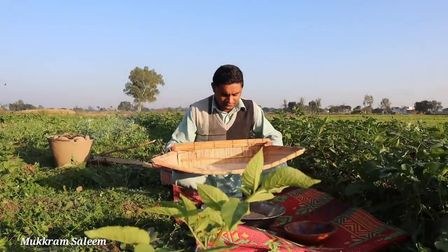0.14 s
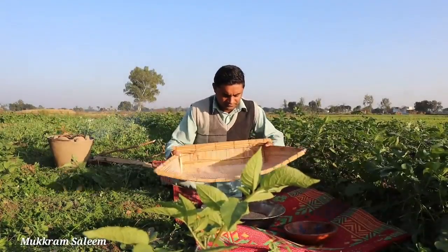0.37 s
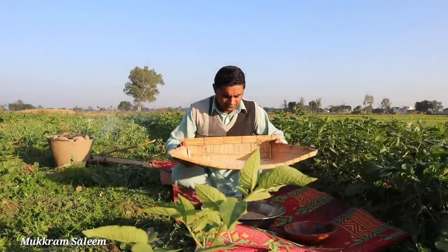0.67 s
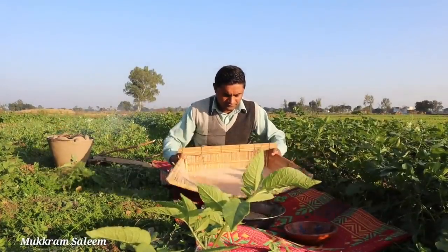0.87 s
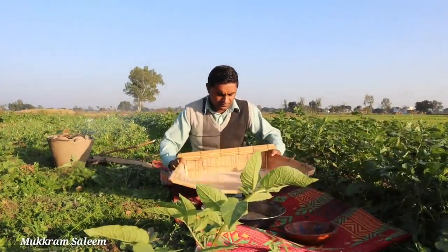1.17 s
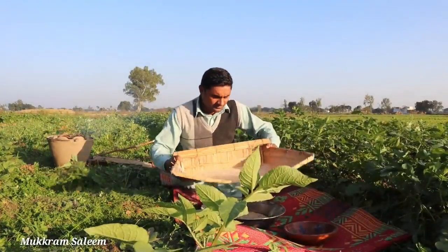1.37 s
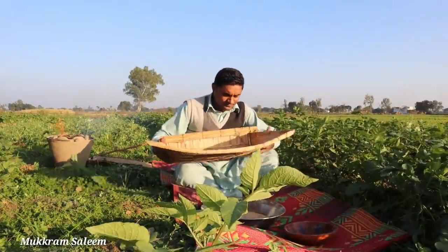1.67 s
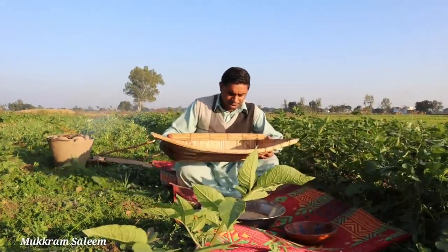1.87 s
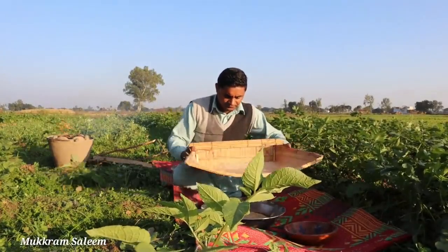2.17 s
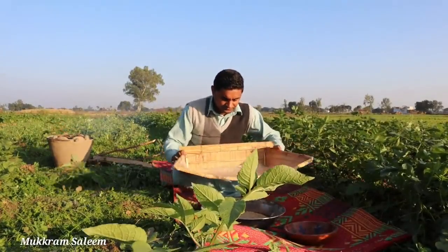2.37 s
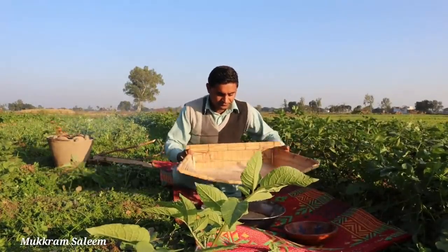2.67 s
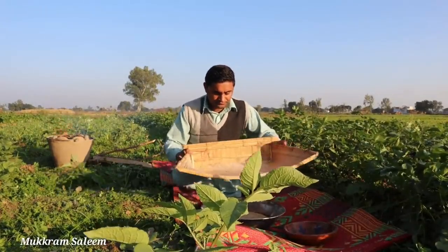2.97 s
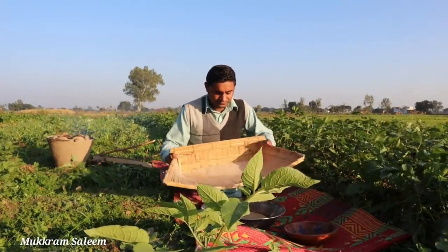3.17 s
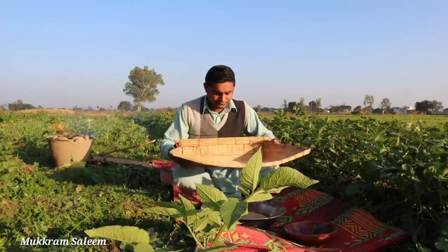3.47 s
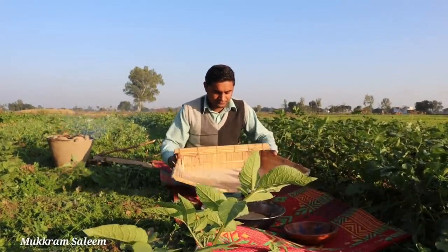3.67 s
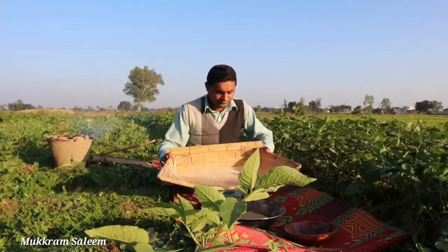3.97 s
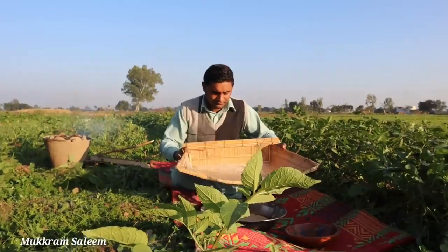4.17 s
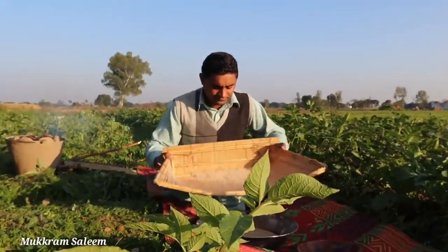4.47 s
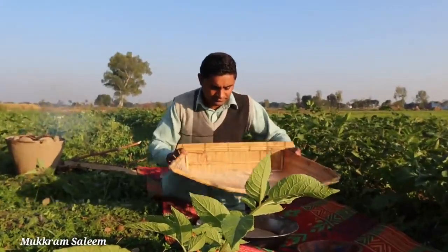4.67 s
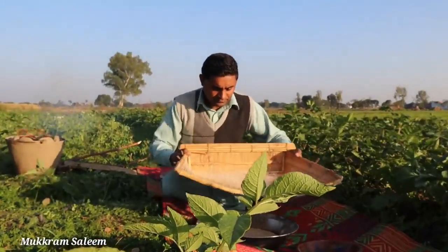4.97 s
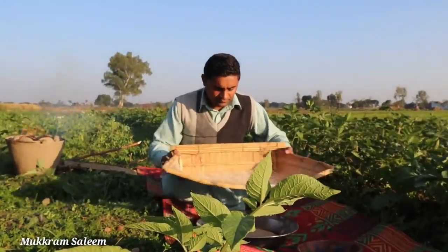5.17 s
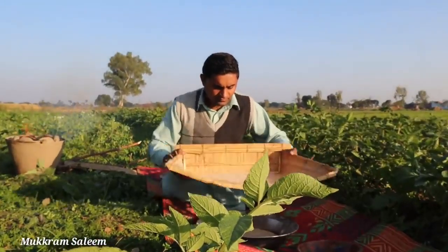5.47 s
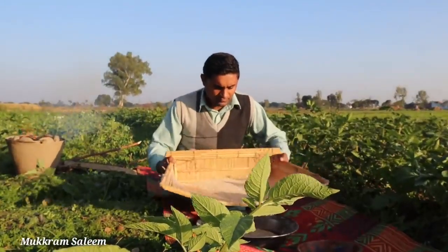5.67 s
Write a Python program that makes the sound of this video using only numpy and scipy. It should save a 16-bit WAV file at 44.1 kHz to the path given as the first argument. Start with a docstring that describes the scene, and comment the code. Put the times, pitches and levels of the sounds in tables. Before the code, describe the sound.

Quick rasping swishes of grain in a woven tray alternate with tosses, slaps and pattering kernels, under gusts of rumbling wind.

```python
"""Coarse cracked grain is winnowed in a reed tray in an open field, heard in mono from close by.
Over a faint background, gusts rumble on the microphone as quick sideways shakes scrape the grain
across the weave and lumps and fingers knock on the tray. The tray is tipped, tossed and slapped;
loose kernels patter and tick. A second bout of shaking ends in more tosses and two slaps as the
wind grows stronger, and a third, the longest and loudest, closes the scene."""
import sys
import numpy as np
from scipy import signal
from scipy.fft import rfft, irfft, next_fast_len
from scipy.io import wavfile
from scipy.ndimage import uniform_filter1d

SR = 44100
rng = np.random.default_rng(int(sys.argv[2]) if len(sys.argv) > 2 else 0)


def wrap_up_sound(samples):
    """Save the sound to the file named by the first command line argument, as 16-bit audio."""
    columns = np.atleast_2d(samples).T
    # keep every value between -1 and 1, then stretch to whole-number steps
    tamed = np.clip(columns, -1, 1)
    steps = np.round(tamed * 32767).astype(np.int16)
    wavfile.write(sys.argv[1], SR, steps)


N = 257086
TIME = np.arange(N) / SR
GRAIN_BAND_HZ = (2500, 13000)


def undb(db):
    """Amplitude grows tenfold for every 20 dB."""
    return 10 ** (np.asarray(db) / 20)


def colour(x, points, band_hz):
    """Minimum-phase filtering gives x a spectrum by causal ringing; unit rms inside the band."""
    size = next_fast_len(N + SR // 4, real=True) // 2 * 2
    hz = np.arange(size // 2 + 1) * SR / size
    point_hz, point_db = np.transpose(points)
    magnitude = undb(np.interp(np.log(hz + 1), np.log(point_hz), point_db))
    cepstrum = irfft(np.log(magnitude))
    cepstrum[1:size // 2] *= 2  # folding the cepstrum makes the response causal
    cepstrum[size // 2 + 1:] = 0
    spectrum = rfft(x, size) * np.exp(rfft(cepstrum))
    in_band = irfft(spectrum * (hz > band_hz[0]) * (hz < band_hz[1]))[:N]
    return irfft(spectrum)[:N] / in_band.std()


def drift(per_s):
    """Linear interpolation between Gaussian values gives a continuous random drift."""
    return np.interp(TIME * per_s, np.arange(N), rng.standard_normal(N))


def swell_power(swells, rest_db):
    """Incoherent sources add in power: exponential rises and falls over a resting level."""
    power = undb(rest_db) ** 2
    for s, db, rise_s, fall_s in swells:
        envelope = np.exp(-np.maximum((s - TIME) / rise_s, (TIME - s) / fall_s))
        power = power + (undb(db) * envelope) ** 2
    return power


# The outdoor background. Each row: frequency in Hz, relative spectral density in dB.
FIELD_SPECTRUM = [(30, -12), (130, -7), (350, -11), (1000, -17.5), (4000, -24), (10000, -35), (15500, -38)]
def open_field(level_db=-47):
    """Ambient noise is broadband and strongest in the bass; its level wanders slightly."""
    noise = colour(rng.standard_normal(N), FIELD_SPECTRUM, band_hz=(20, 16000))
    return noise * undb(level_db + drift(per_s=3.02))


def turbulence(spectrum, band_hz, even_s=0.044):
    """Turbulent pressure is random: coloured noise, held even by dividing by its running rms."""
    noise = colour(rng.standard_normal(N), spectrum, band_hz)
    return noise / np.sqrt(uniform_filter1d(noise ** 2, int(even_s * SR)) / noise.var())


# The two registers of the wind. Each row: frequency in Hz, relative spectral density in dB.
RUMBLE_SPECTRUM = [(12, -9), (30, 3.5), (62, 4.5), (110, 5.5), (200, -40.5), (600, -96)]
FLUTTER_SPECTRUM = [(60, -10), (130, 0), (175, -12.5), (240, -15.5), (500, -24.5), (2000, -76)]
# Gusts. Each row: time of the peak in seconds, relative rumble and flutter in dB, rise in seconds.
WIND_GUSTS = [(0.07, -43, -41, 0.022), (0.551, -30.5, -58, 0.021), (0.8, -38, -36.5, 0.025),
              (0.92, -50, -35, 0.029), (2.69, -34, -68, 0.029), (2.95, -34, -41, 0.025),
              (3.14, -27, -49, 0.044), (3.67, -26, -23.5, 0.073), (3.91, -29.5, -44, 0.16),
              (4.3, -24, -30, 0.043), (4.46, -26, -36, 0.061), (4.87, -30, -35, 0.047),
              (5.25, -37.5, -50, 0.13), (5.44, -35.5, -40.5, 0.081)]
def wind(fall_ratio=1.43, gain_db=-1):
    """Turbulence on the microphone rumbles and, higher up, flutters as gusts rise out of a breeze."""
    rumble_gusts = [(s, db, rise, fall_ratio * rise) for s, db, _, rise in WIND_GUSTS]
    flutter_gusts = [(s, db, rise, fall_ratio * rise) for s, _, db, rise in WIND_GUSTS]
    rumble = turbulence(RUMBLE_SPECTRUM, band_hz=(20, 110))
    flutter = turbulence(FLUTTER_SPECTRUM, band_hz=(110, 280))
    rumble *= np.sqrt(swell_power(rumble_gusts, rest_db=-50))
    flutter *= np.sqrt(swell_power(flutter_gusts, rest_db=-53))
    return undb(gain_db) * (rumble + flutter)


# Bouts of sideways shaking. Each row: first and last stroke in seconds, number of strokes.
SHAKE_BOUTS = [(0.064, 0.651, 6), (2.337, 3.428, 9), (4.331, 5.778, 12)]
# Effort in each bout. Each row: level at start, middle and end in dB, extra treble at start and end in dB.
SHAKE_EFFORT = [(-31, -33, -31, 1.5, 0.8), (-33, -31, -30, 0.8, -2), (-29.5, -27.5, -30, -1.8, 1.1)]
def strokes(quickening=0.073, half_length_share=0.34, last_stroke_db=-3.5):
    """Shaking is a driven oscillation whose period shortens; the arms ease off on the last stroke."""
    slides = []
    for (first_s, last_s, count), effort in zip(SHAKE_BOUTS, SHAKE_EFFORT):
        length_s = last_s - first_s
        for along in np.linspace(0, 1, count):
            s = first_s + length_s * along * (1 + quickening * (1 - along))
            period_s = length_s / (count - 1) * (1 + quickening * (1 - 2 * along))
            db = np.interp(along, [0, .5, 1], effort[:3]) + last_stroke_db * (along == 1)
            treble_db = np.interp(along, [0, 1], effort[3:])
            slides.append((s, db, half_length_share * period_s, treble_db))
    return slides


def slide_power(slides):
    """Friction noise follows speed: each slide adds a Gaussian bell of power."""
    bells = (undb(db) ** 2 * np.exp(-((TIME - s) / half_s) ** 2) for s, db, half_s, _ in slides)
    return sum(bells) + 1e-12


def impacts(per_s, spread_db):
    """Shot noise: kernels land independently and with unequal force; unit rms at any rate."""
    chance = np.clip(per_s / SR, 1 / SR, 1)
    sign = rng.choice([-1, 1], N)
    strength = undb(spread_db * np.minimum(rng.exponential(size=N), 2 * np.e))
    pulses = (rng.random(N) < chance) * sign * strength / np.sqrt(chance)
    return pulses / pulses.std()


# Grain scraping on reeds. Each row: frequency in Hz, relative spectral density in dB.
SLIDE_SPECTRUM = [(200, -19.5), (470, -9), (840, -11), (1150, -3.5), (1560, -1.5), (1860, -8.5),
                  (2600, -4.5), (3550, -0.5), (4150, -4), (4600, -10), (5300, -17.5), (7500, -9),
                  (10000, -11.5), (15500, -30)]
# The whole bed slides once as the tray is tipped or caught. Each row: time of full speed in seconds,
# level in dB, half length in seconds, extra treble in dB.
TRAY_TIPS = [(0.968, -33.5, 0.05, -2.5), (1.285, -45, 0.039, -6), (1.672, -45.5, 0.04, 1.5),
             (2.165, -39.5, 0.047, -3.5), (3.767, -30.5, 0.025, 1), (4.142, -38.5, 0.041, -3.5)]
def sliding_grain(scrapes_per_s=22000, clump_db=0.82, treble_hz=5000, treble_share=0.92):
    """Sliding friction is a stream of tiny impacts: the faster the bed, the more kernels scrape."""
    slides = strokes() + list(TRAY_TIPS)
    power = slide_power(slides)
    # the finest hiss needs speed, so it fills only the middle share of a slide
    treble_slides = [(s, db + extra_db, treble_share * half_s, 0) for s, db, half_s, extra_db in slides]
    speed = np.sqrt(power / power.max())
    scrapes = impacts(scrapes_per_s * speed + 1500, spread_db=2.0)
    clumps = undb(clump_db * drift(per_s=110))
    hiss = colour(scrapes * clumps, SLIDE_SPECTRUM, GRAIN_BAND_HZ)
    treble = signal.sosfiltfilt(signal.butter(2, treble_hz, "high", fs=SR, output="sos"), hiss)
    return (hiss - treble) * np.sqrt(power) + treble * np.sqrt(slide_power(treble_slides))


# Kernels on the reeds and on the tray floor. Each row: frequency in Hz, relative density in dB.
CRACKLE_SPECTRUM = [(500, -23), (1900, 0.5), (2600, 3.5), (3900, 5.5), (4700, -11), (7300, -5), (9500, -7),
                    (15500, -24)]
PATTER_SPECTRUM = [(130, -34), (260, -4.5), (350, -3), (470, -1), (650, -2.5), (860, -2.5), (1230, 4.5),
                   (1380, 1.5), (1530, 3), (1850, -9.5), (4000, -37), (12000, -46)]
# Tossed kernels landing. Each row: time of the thickest fall in seconds, crackle and patter in dB,
# build-up and settling in seconds.
KERNEL_SPILLS = [(0.46, -37.5, -37.5, 0.032, 0.089), (0.8, -44, -36.5, 0.038, 0.017),
                 (1.025, -39.5, -36, 0.06, 0.039), (1.268, -38.5, -37.5, 0.032, 0.042),
                 (1.708, -39, -37.5, 0.063, 0.049), (1.869, -43.5, -44.5, 0.017, 0.2),
                 (3.549, -44, -36, 0.041, 0.15), (3.801, -41.5, -43.5, 0.015, 0.13),
                 (4.06, -41, -40, 0.0068, 0.13)]
def loose_kernels(stirred_db=-7, stirred_s=0.17, clump_db=3.5):
    """Impact noise: light kernels mostly crackle, heavy ones drum; both thin out as they settle."""
    # shaking keeps some kernels rolling between strokes
    stirred = uniform_filter1d(slide_power(strokes()), int(stirred_s * SR)) * undb(stirred_db) ** 2
    crackle_spills = [(s, db, rise, fall) for s, db, _, rise, fall in KERNEL_SPILLS]
    patter_spills = [(s, db, rise, fall) for s, _, db, rise, fall in KERNEL_SPILLS]
    crackle_power = swell_power(crackle_spills, rest_db=-55) + stirred
    patter_power = swell_power(patter_spills, rest_db=-54.5) + stirred
    crowding = np.sqrt(crackle_power / np.median(crackle_power))
    clumps = undb(clump_db * drift(per_s=70))
    light = impacts(per_s=2600 * crowding, spread_db=-0.5)
    heavy = impacts(per_s=1100 * crowding, spread_db=2.0)
    crackle = colour((light + .5 * heavy) * clumps, CRACKLE_SPECTRUM, GRAIN_BAND_HZ)
    patter = colour((heavy + .5 * light) * clumps, PATTER_SPECTRUM, band_hz=(300, 1800))
    return crackle * np.sqrt(crackle_power) + patter * np.sqrt(patter_power)


def place(start_s, sound):
    """A pure delay sets a short sound at its time in the scene."""
    return np.pad(sound, (int(start_s * SR), N))[:N]


# Modes of the woven tray. Each row: frequency in Hz, relative level in dB, 60 dB decay in seconds.
TRAY_MODES = [(176.5, -6, 0.087), (360, -0.5, 0.035), (469, 1, 0.026), (619, -5.5, 0.044), (723, -7, 0.041),
              (940, -13, 0.0071), (1040, -3.5, 0.033), (1230, -5, 0.024), (1450, -7, 0.051),
              (1509, 9, 0.014), (1500, -43, 0.025), (2230, -12.5, 0.01), (2880, 0, 0.0079),
              (3380, 3.5, 0.019), (3900, 4, 0.013), (4670, -24, 0.012), (7400, 11, .0025),
              (9240, 18, .0025)]
def tray_blow(level_db, bright_hz, spot_hz, rattle_s, spot_db=6, spot_octaves=0.26, crunch_s=0.0023):
    """A push and a rattle of reeds excite damped modes, favouring those near the struck spot's pitch."""
    t = np.arange(SR // 8) / SR
    hz, db, t60 = np.transpose(TRAY_MODES)[:, :, None]
    # the grip and the load of grain shift every mode a little in level and pitch
    grip, load = rng.standard_normal((2, len(TRAY_MODES), 1))
    mode_db = db + spot_db * np.exp(-(np.log2(hz / spot_hz) / spot_octaves) ** 2) + 2.5 * grip
    mode_hz = hz * (1 + 0.019 * load)
    ring = (undb(mode_db - 60 * t / t60) * np.cos(2 * np.pi * mode_hz * t)).sum(0)
    force = 0.21 * rng.standard_normal(len(t)) * np.exp(-t / rattle_s)
    force[0] += 1 / (1 + (rattle_s / crunch_s) ** 2)  # a long rattle is all crunch and little push
    soft_contact = signal.butter(2, bright_hz, fs=SR, output="sos")
    stiff_spot = signal.butter(2, 0.22 * spot_hz, "high", fs=SR, output="sos")
    vibration = signal.fftconvolve(force, ring)[:len(t)]
    blow = signal.sosfilt(np.vstack([soft_contact, stiff_spot]), vibration)
    rms = np.sqrt(np.sum(blow ** 2) / (.01 * SR))  # as if all its energy fell within 10 ms
    return undb(level_db) * blow / rms


# Knocks. Each row: start in seconds, level in dB, pitch of the spot in Hz, rattle in seconds.
TRAY_KNOCKS = [(0.055, -33.5, 1080, 0.0029), (0.226, -36.5, 1040, 0.0023), (0.336, -31.5, 1400, 0.0013),
               (0.456, -31.5, 1140, 0.0027), (0.55, -30.5, 600, 0.0072), (0.802, -36, 396, 0.0043),
               (0.916, -26.5, 620, 0.0036), (0.961, -32, 2490, 0.0019), (1.162, -46, 1490, 0.00091),
               (1.478, -41.5, 1250, 0.0017), (1.558, -39, 617, 0.0044), (1.711, -43, 2900, 0.0052),
               (1.861, -37.5, 600, 0.0046), (1.908, -41, 800, 0.0017), (3.36, -25.5, 1470, 0.0036),
               (3.559, -32.5, 2000, 0.004), (3.596, -31.5, 300, 0.0055), (3.651, -31, 300, 0.0075),
               (3.817, -32.5, 300, 0.0058), (4.327, -29, 1560, 0.003), (4.683, -28.5, 1180, 0.0022),
               (5.603, -32, 1220, 0.0016)]
def knocks(reach_hz=640):
    """Impulsive excitation: lumps and fingers ring the tray up to a little above the spot's pitch."""
    return sum(place(s, tray_blow(db, spot_hz + reach_hz, spot_hz, rattle_s))
               for s, db, spot_hz, rattle_s in TRAY_KNOCKS)


# Single eddies. Each row: start in seconds, peak in dB, frequency in Hz, rise in seconds.
EDDIES = [(0.505, -16, 41.8, 0.027), (2.915, -21.5, 54.3, 0.029), (3.594, -21.5, 177.3, 0.017),
          (3.643, -20, 187, 0.0099), (3.805, -16, 134.3, 0.013), (3.895, -22, 66.4, 0.012),
          (4.047, -23, 155, 0.0041), (4.268, -24, 123, 0.012), (4.793, -23.5, 175.5, 0.023)]
def buffets(sag=0.099, wobble=0.33):
    """An eddy passing the microphone is a pressure oscillation that swells, wavers, slows and dies."""
    out, t = np.zeros(N), np.arange(SR // 4) / SR
    for s, peak_db, hz, rise_s in EDDIES:
        age = t / rise_s
        speed = 1 + sag * np.tanh(1 - age / 2) + wobble * drift(2 * hz)[:len(t)]
        turns = np.cumsum(hz * speed) / SR + rng.random()
        envelope = undb(peak_db) * age * np.exp(1 - age)
        out += place(s, envelope * np.sin(2 * np.pi * turns))
    return out


# Slaps. Each row: start in seconds, crunch in dB, thud delay in seconds, thud in dB,
# pitch of the spot under the palm in Hz, clack delay in seconds, clack in dB.
TRAY_SLAPS = [(1.2419, -22.5, 0.0023, -12.5, 1180, 0.0148, -18.5),
              (3.748, -25, 0.0115, -17.5, 560, 0.0095, -26),
              (4.0442, -30.5, 0.0075, -17, 594, 0.00348, -19.5)]
def slaps():
    """Softer contacts excite fewer high modes: the reeds crunch, the palm thuds, the rim clacks."""
    out = np.zeros(N)
    for s, crunch_db, thud_s, thud_db, palm_hz, clack_s, clack_db in TRAY_SLAPS:
        crunch = tray_blow(crunch_db, bright_hz=4800, spot_hz=2750, rattle_s=0.005)
        thud = tray_blow(thud_db, bright_hz=1250, spot_hz=palm_hz, rattle_s=0.0011)
        clack = tray_blow(clack_db, bright_hz=2200, spot_hz=1700, rattle_s=0.0021)
        out += place(s, crunch) + place(s + thud_s, thud) + place(s + clack_s, clack)
    return out


# Kernels ticking and reeds snapping or squeaking.
# Each row: start in seconds, peak in dB, frequency in Hz, length in seconds.
SMALL_TICKS = [(1.535, -46.5, 2250, 0.023), (1.725, -40, 5100, 0.027), (1.927, -33.5, 4070, 0.0056),
               (2.056, -48, 8500, .0015), (2.12, -35, 10000, 0.0024), (3.554, -28, 2270, 0.0095),
               (3.824, -31, 4120, 0.0062), (5.038, -20, 3600, .002)]
def ticks(q_per_s=1100, least_q=4.3):
    """A noise burst drives a resonance: short ones snap, longer ones narrow to a squeak."""
    out, t = np.zeros(N), np.arange(SR // 8) / SR
    for s, peak_db, hz, length_s in SMALL_TICKS:
        slip = rng.standard_normal(len(t)) * np.exp(-(t / (2 * length_s)) ** 2)
        resonance = signal.iirpeak(hz, least_q + q_per_s * length_s, fs=SR)
        snap = signal.lfilter(*resonance, slip)
        out += place(s, undb(peak_db) * snap / np.abs(snap).max())
    return out


def scene(hollow_hz=1560, hollow_q=11, hollow_share=0.29, dip_hz=4530, dip_q=22):
    """Superposition in a free field: tray, wind and background add at one microphone without echo."""
    grain = sliding_grain() + loose_kernels()
    hollow_ring = signal.lfilter(*signal.iirpeak(hollow_hz, hollow_q, fs=SR), grain)
    tray = grain + hollow_share * hollow_ring + slaps() + knocks()
    tray = signal.lfilter(*signal.iirnotch(dip_hz, dip_q, fs=SR), tray)  # one narrow dip in its sound
    mono = tray + open_field() + ticks() + wind() + buffets()
    return np.array([mono, mono])


def record(dry, top_hz=15450):
    """Band limiting: an elliptic low-pass filter cuts the highest treble off steeply."""
    return signal.sosfilt(signal.ellip(10, .2, 80, top_hz, fs=SR, output="sos"), dry)


dry = scene()
out = record(dry)
wrap_up_sound(out)
```